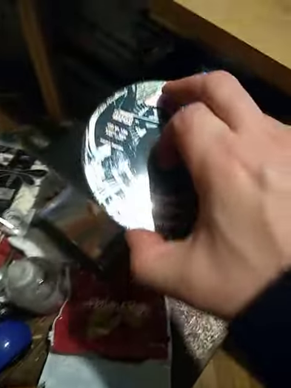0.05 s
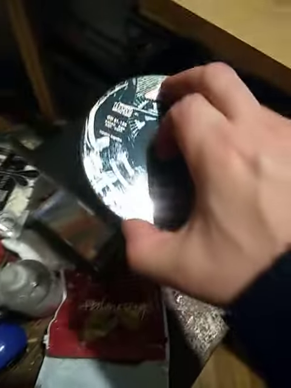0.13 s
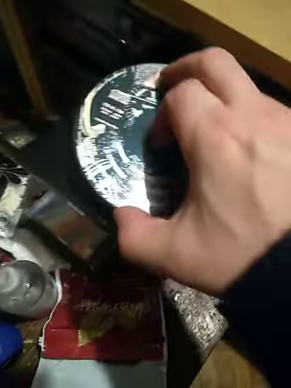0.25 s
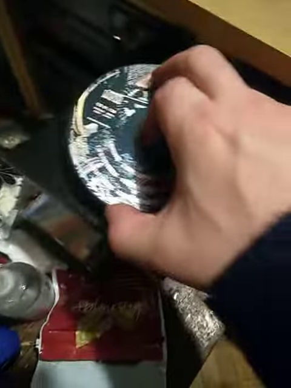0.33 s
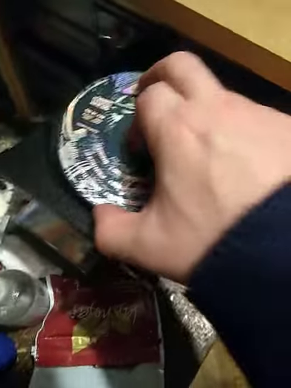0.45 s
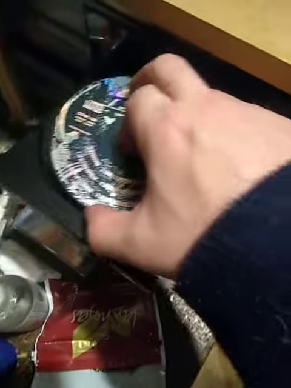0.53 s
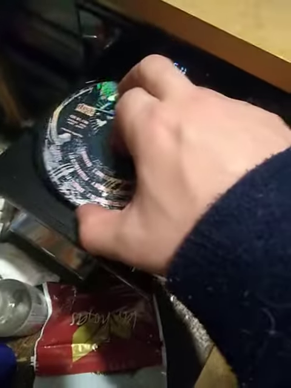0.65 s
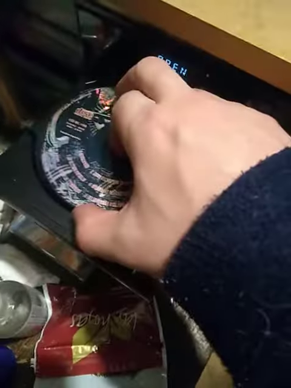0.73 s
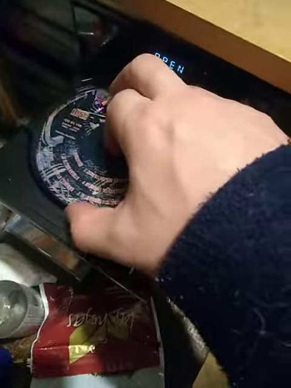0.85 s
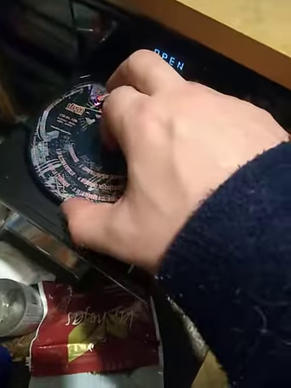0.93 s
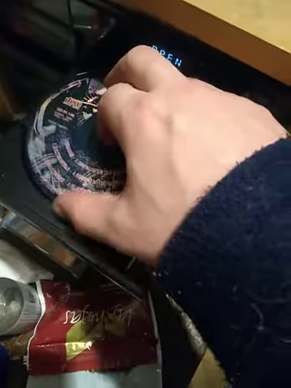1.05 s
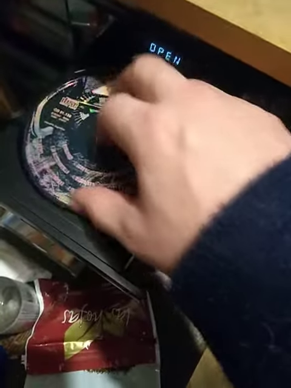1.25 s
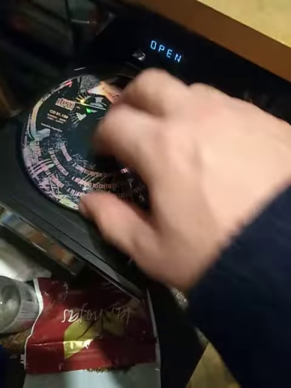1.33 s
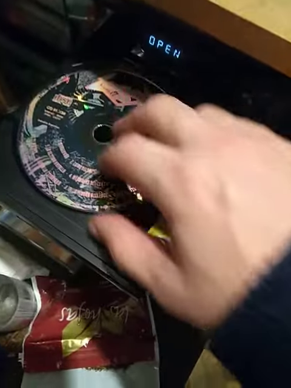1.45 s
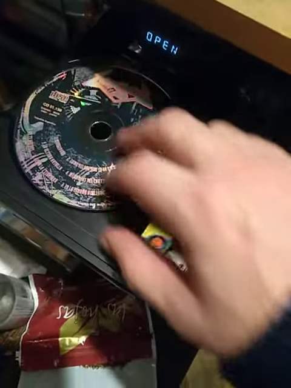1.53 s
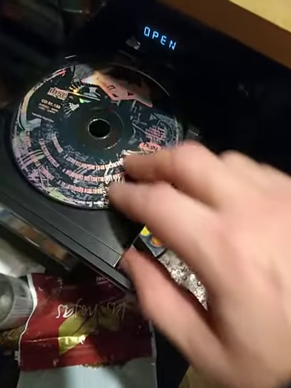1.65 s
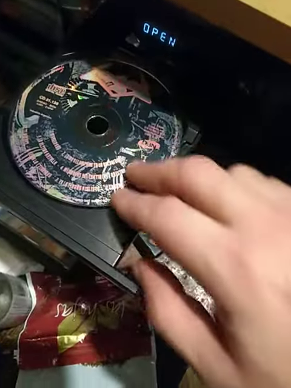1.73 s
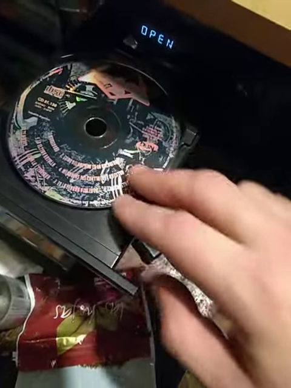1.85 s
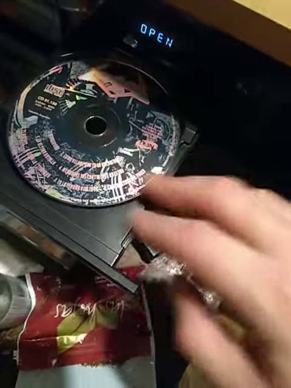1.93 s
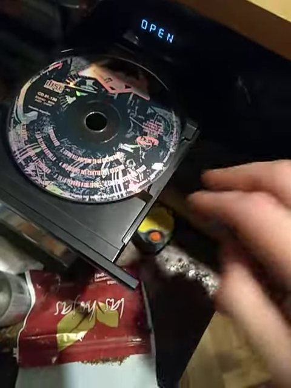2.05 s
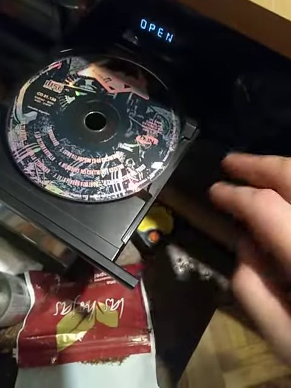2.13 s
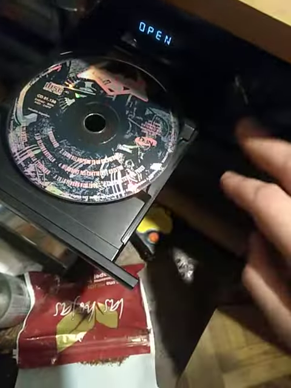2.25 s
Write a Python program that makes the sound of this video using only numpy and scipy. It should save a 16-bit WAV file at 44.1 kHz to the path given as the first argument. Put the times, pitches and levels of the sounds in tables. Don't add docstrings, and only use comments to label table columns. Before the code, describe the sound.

A disc drops with a hard plastic clack into an open player tray, then the tray clicks, whirrs inward on a small motor and grinds shut.

```python
import sys
import numpy as np
from scipy import signal
from scipy.fft import rfft, irfft, next_fast_len
from scipy.io import wavfile
from scipy.ndimage import uniform_filter1d

SR = 44100
rng = np.random.default_rng(int(sys.argv[2]) if len(sys.argv) > 2 else 0)


def elevation(decibels):
    levels = np.asarray(decibels, float)
    return 10 ** (levels / 20)


def generate_wav(signal):
    frames = np.transpose(np.atleast_2d(signal))
    scaled = np.clip(frames, -1, 1) * 32767
    pcm = np.round(scaled).astype(np.int16)
    wavfile.write(sys.argv[1], SR, pcm)


N = 246078


def evened(x):
    return x / np.sqrt(np.mean(x ** 2) + 1e-20)


def read(points, hz):
    f, value = np.transpose(points)
    return np.interp(np.log(hz + 1), np.log(f + 1), value)


def colour(x, points):
    size = next_fast_len(x.shape[-1])
    gain = elevation(read(points, np.fft.rfftfreq(size, 1 / SR)))
    return irfft(rfft(x, size) * gain, size)[..., :x.shape[-1]]


def resonate(x, hz, width_hz):
    r = np.exp(-np.pi * width_hz / SR)
    return signal.lfilter([1 - r, 0, r - 1], [1, -2 * r * np.cos(2 * np.pi * hz / SR), r * r], x)


def resonate_twice(x, hz, width_hz):
    return resonate(resonate(x, hz, width_hz), hz, width_hz)


def wander(size, hz):
    return evened(signal.lfilter([1], [1, -np.exp(-2 * np.pi * hz / SR)], rng.standard_normal(size)))


def add(mix, s, sound):
    part = mix[round(s * SR):][:len(sound)]
    part += sound[:len(part)]


# f/Hz, level/dB
RUMBLE = [(30, -17), (60, -8), (120, 1.5), (165, 5.5), (270, -3.5), (320, -4), (400, -24), (600, -88)]
# f/Hz, width/Hz, level/dB
HUM = [(157.8, 8.2, -8.5), (255, 75, -10), (288.5, 21, -9.5)]
# f/Hz, level/dB
HISS = [(60, -9.5), (450, -4.5), (800, -7), (1400, -10), (3500, -14), (7000, -20), (10000, -25.5),
        (15000, -28)]
# f/Hz, share/1
SAME = [(60, 0.31), (200, 1), (350, 0.55), (550, 0.12), (1500, 0.067), (4000, 0.017)]
# t/s (middle), half length/s, lift/dB
SURGES = [(0.0, 0.025, 3), (0.269, 0.037, 6.5), (0.744, 0.014, 4), (0.823, 0.021, 8.5), (.93, 0.04, -2),
          (1.238, 0.11, 6.5), (1.47, 0.07, 4), (1.633, 0.033, 2.5), (1.756, 0.025, -2), (1.826, 0.023, 5.5),
          (1.928, 0.061, 5), (2.186, 0.14, 4.5), (2.35, 0.022, -4), (2.493, 0.035, 4), (2.74, 0.11, 3.5),
          (3.03, 0.026, -0.5), (3.277, 0.028, 5.5), (3.497, .13, 2), (4.943, .1, 5), (5.287, 0.16, 5.5)]


def floor():
    lag_s = 0.00022
    lift_start_s, lift_end_s, lift_ramp_s, lift_db = 3.75, 5.47, 0.11, 7
    size = next_fast_len(N)
    hz = np.fft.rfftfreq(size, 1 / SR)
    near, other = rfft(rng.standard_normal((2, 2, size)))
    same = np.clip(read(SAME, hz), 0, .99)
    late = same * near * np.exp(-2j * np.pi * hz * lag_s) + np.sqrt(1 - same ** 2) * other
    low, high = irfft(np.stack([near, late], axis=1), size)[..., :N]
    t = np.arange(N) / SR
    swell_db = sum(db * np.exp(-((t - s) / half) ** 2) for s, half, db in SURGES)
    to_edge_s = np.minimum(t - lift_start_s, lift_end_s - t)
    swell_db += lift_db * np.clip(to_edge_s / lift_ramp_s, 0, 1)
    swell_db += 2.8 * uniform_filter1d(wander(N, 26.0), 400)
    hum = sum(elevation(db) * evened(resonate_twice(low, f, 0.69 * w)) for f, w, db in HUM)
    rumble = (evened(colour(low, RUMBLE)) + hum) * elevation(-50.0 + swell_db)
    return rumble + evened(colour(high, HISS)) * elevation(-59.5)


def hit(db, hz, t60, treble_db, bass_db, modes, bright, own_db, blow_s, damping=0.26):
    t = np.arange(SR // 4) / SR
    blow_noise, crack_noise, thud_noise, spot_noise = rng.standard_normal((4, len(t)))
    blow = blow_noise * (t / blow_s) * np.exp(-t / blow_s)
    ring = sum(elevation(d - 60 * t / min(decay, 1.57 * t60)) * np.sin(2 * np.pi * f * t)
               for f, d, decay in modes)
    body = signal.fftconvolve(blow, ring)[:len(t)]
    spot = evened(resonate_twice(spot_noise, hz, damping * hz)) * elevation(own_db - 60 * t / t60)
    crack = evened(colour(crack_noise, bright)) * elevation(treble_db - 60 * t / (0.93 * t60))
    thud = evened(resonate_twice(thud_noise, 272, 330)) * elevation(bass_db - 60 * t / (1.83 * t60))
    rise = 1 - np.exp(-t / blow_s)
    thud_rise = 1 - np.exp(-t / 0.011)
    return elevation(db) * (body / abs(body).max() + rise * (spot + crack) + thud * thud_rise)


# t/s, peak/dB, ring f/Hz, treble/dB
TOUCHES = [
    (.795, -55, 890, 5),
    (.962, -45.5, 900, 4),
    (0.966, -47.5, 1600, -1),
    (1.413, -50.5, 1046, 7),
    (1.751, -44.5, 2140, -2),
    (1.777, -43, 1075, -2),
    (1.808, -39, 900, 6),
    (1.849, -51, 970, -5),
    (2.93, -52.5, 1400, 6.5),
    (3.504, -52, 682, -20),
]
# f/Hz, level/dB, t60/s
DISC_MODES = [(291, -5, .2), (532, -21, 0.044), (780, -9, 0.18), (900, -2.5, 0.06), (1010, 0, 0.06),
              (1400, -16, 0.2), (1803, -13, 0.16), (2146, -75, 0.022), (3610, -0.5, 0.027),
              (5900, 1.5, 0.0084), (7000, -7, 0.022)]
# f/Hz, level/dB
SCUFF = [(500, -18), (1000, -3), (2000, -1.5), (3600, -4.5), (5000, -9.5), (8000, -30), (15000, -49)]


def touches(mix):
    for s, db, hz, treble_db in TOUCHES:
        add(mix, s, hit(db - 7.0, hz, 0.13, treble_db, -18, DISC_MODES, SCUFF,
                        own_db=3.0, blow_s=0.0073, damping=0.046))


# t/s, peak/dB, ring f/Hz
THUMPS = [
    (1.166, -36.5, 297),
    (1.181, -36, 900),
    (5.172, -29.5, 370),
    (5.222, -21, 347),
    (5.263, -30, 524),
    (5.353, -27, 340),
    (5.40, -41, 330),
    (5.429, -33, 286),
]
# f/Hz, level/dB, t60/s
CASE_MODES = [(330, -6.5, 0.05), (890, -3.5, 0.2), (1111, -4.5, 0.12), (1410, 0.5, 0.035), (1905, 3, 0.012),
              (2560, -0.5, 0.025), (3545, -12.5, 0.026), (4580, -20, 0.05), (6170, -24.5, 0.047)]


def thumps(mix):
    for s, db, hz in THUMPS:
        add(mix, s, hit(db, hz, 0.069, -15, -2.5, CASE_MODES[:1], SCUFF,
                        own_db=1.0, blow_s=0.0028, damping=0.17))


# t/s, peak/dB, ring f/Hz, t60/s
DISC = [
    (1.187, -9, 887, 0.069),
    (1.294, -36.5, 980, 0.084),
    (1.366, -34.5, 1110, 0.12),
]
# f/Hz, level/dB
CRACK = [(500, -15), (1500, -9.5), (3500, -8), (6000, -6), (8000, -15), (11000, -30), (15000, -33.5)]
# f/Hz, level/dB
CLACK = [(500, -26.5), (1200, -2), (2000, 1.5), (4000, 0), (6000, -4.5), (8000, -14), (15000, -30)]


def disc(mix):
    for s, db, hz, t60 in DISC:
        bright = CRACK if s < 1.25 else CLACK
        add(mix, s, hit(db - 5.5, hz, t60, -2, -4.5, DISC_MODES, bright, own_db=-9.0, blow_s=0.00074))


# t/s, peak/dB, ring f/Hz, treble/dB, bass/dB
KNOCKS = [(3.713, -25, 1410, 4.5, -36), (3.724, -34, 1300, -12, -14), (3.758, -11.5, 985, -3.5, -15),
          (3.803, -18.5, 950, -3, -3), (3.857, -19.5, 1400, -3, -7), (3.865, -18, 1260, -8, -5),
          (3.884, -7, 1410, -23, -12), (3.899, -25, 1170, -11, -20), (4.59, -22.5, 1410, -24, -21),
          (5.165, -18.5, 905, -24, -20), (5.199, -23, 755, -20, -29), (5.29, -23.5, 840, -12.5, -4)]


def knocks(mix):
    for s, db, hz, treble_db, bass_db in KNOCKS:
        add(mix, s, hit(db - 7.0, hz, 0.042, treble_db, bass_db, CASE_MODES, CLACK,
                        own_db=-3.0, blow_s=0.00093))


# t/s, peak/dB, treble/dB, bass/dB
SNAPS = [
    (3.7877, -38, 18, 9.5),
    (5.1562, -19, -32, -20),
    (5.3494, -25, 2, -17),
]


def snaps(mix):
    for s, db, treble_db, bass_db in SNAPS:
        add(mix, s, hit(db - 2.0, 3400, .034, treble_db, bass_db, CASE_MODES, CLACK,
                        own_db=2.5, blow_s=0.0024))


# t/s, level/dB
MOTOR = [
    (3.905, -30.5),
    (3.92, -38),
    (4.2, -36.5),
    (4.392, -35.5),
    (4.61, -40),
    (4.92, -36),
    (5.03, -36),
    (5.143, -40),
]
# t/s, f/Hz
SPEED = [(3.89, 281), (4.0, 287), (4.33, 291), (4.44, 288.5), (4.55, 277.5), (4.86, 273), (4.95, 284),
         (5.03, 291), (5.16, 292)]
# f/Hz, width/Hz, level/dB
CHASSIS = [(553, 19, -11), (870, 25, 1.3), (1074, 64, -24), (1390, 145, 4.5), (1556, 90, -19),
           (2170, 160, -19)]
# f/Hz, level/dB
GEARS = [(200, -24.5), (560, -19), (720, -6), (830, -2.5), (1400, 2), (2200, -4), (3000, -8), (3600, -6),
         (4600, 0.5), (5500, -24.5), (6000, -56), (6450, -16.5), (7200, -46), (12000, -88.5)]


def motor():
    teeth_per_turn = 0.21
    rattle_start_db, rattle_db_per_s = -53.5, 5.5
    rack_end_s, squeal_start_db, squeal_db_per_s = 4.9, -56, 44
    s, effort_db = np.transpose(MOTOR)
    t = np.arange(s[0] - .015, s[-1] + 0.023, 1 / SR)
    size = len(t)
    rattle_db = rattle_start_db + rattle_db_per_s * (t - t[0])
    squeal_db = squeal_start_db + squeal_db_per_s * np.maximum(t - rack_end_s, 0)
    hz = np.interp(t, *np.transpose(SPEED))
    turns = np.cumsum(hz * (1 + .008 * wander(size, 40))) / SR
    throb = np.cos(2 * np.pi * (teeth_per_turn * turns + 0.11 * wander(size, 6.9)))
    pulses = sum(np.cos(2 * np.pi * k * turns) for k in range(1, 16)) * elevation(3 * wander(size, 30))
    whine = evened(sum(elevation(db) * resonate_twice(pulses, f, 1.5 * w) for f, w, db in CHASSIS))
    chop = 0.67 + np.exp(-(turns % 1) / 1.5)
    chopped = rng.standard_normal(size) * chop * elevation(1.8 * wander(size, 54))
    gears = evened(colour(chopped, GEARS))
    high = signal.sosfilt(signal.butter(4, 2600, "high", fs=SR, output="sos"), gears)
    buzz = evened(sum(elevation(db) * resonate(chopped, f, 0.5 * w) for f, w, db in CHASSIS))
    low = elevation(-3.5) * whine + elevation(-14) * buzz + elevation(-4) * evened(gears - high)
    squeal = elevation(squeal_db) * evened(resonate_twice(chopped, 3500, 600))
    rattle = elevation(rattle_db) * evened(high) + squeal
    sound = (elevation(np.interp(t, s, effort_db)) * low + rattle) * elevation(3.4 * throb)
    return t[0], sound * signal.windows.tukey(size, .025)


# t/s, pressure/dB
CLAMP = [
    (5.15, -36),
    (5.164, -40),
    (5.186, -48),
    (5.23, -34.5),
    (5.25, -40.5),
    (5.38, -38.5),
    (5.446, -57.5),
    (5.49, -80),
]
# f/Hz, level/dB
GRIND = [
    [(60, -7), (150, -9), (330, 12), (520, -10), (750, -1), (1100, -67)],
    [(500, -10), (800, 13.5), (1000, 6), (1400, 8), (2000, -10), (2600, -37)],
    [(1800, 3.5), (2500, 7.5), (3400, 14), (4300, 7.5), (5200, -1.5), (6500, -15.5), (9000, -70)],
]


def clamp():
    tray_db, gears_db, case_peak_db = -4, 2, -34.5
    seat_s, seat_rise_db_per_s, seat_fall_db_per_s = 5.23, 500, 112
    s, pressure_db = np.transpose(CLAMP)
    t = np.arange(s[0], s[-1], 1 / SR)
    size = len(t)
    slip_now = rng.random(size) < 700 / SR
    slip_amp = elevation(2.6 * np.minimum(rng.exponential(1, size), 2.5))
    slips = slip_now * slip_amp * rng.choice([-1, 1], size)
    drive = evened(slips) + 0.83 * rng.standard_normal(size)
    drive = drive * elevation(5.5 * np.cos(2 * np.pi * (54 * t + 0.25 * wander(size, 16))))
    pressure_db = np.interp(t, s, pressure_db)
    case_db = case_peak_db - np.maximum(seat_rise_db_per_s * (seat_s - t),
                                        seat_fall_db_per_s * (t - seat_s))
    levels_db = case_db, pressure_db + tray_db, pressure_db + gears_db
    grind = sum(evened(colour(drive, part)) * elevation(db) for part, db in zip(GRIND, levels_db))
    return s[0], grind * signal.windows.tukey(size, .08)


# f/Hz, t60/s
ROOM = [(100, 0.32), (500, 0.3), (2000, 0.19), (8000, 0.12), (15000, 0.31)]


def room(x):
    taps = np.zeros((2, SR // 2))
    jitter = rng.integers(0, 20, (2, (SR // 2 - 121) // 20))
    at = np.arange(120, SR // 2 - 20, 20) + jitter
    np.put_along_axis(taps, at, rng.choice([-1., 1.], at.shape), 1)
    hz, t, z = signal.stft(taps, SR, nperseg=256)
    tail = signal.istft(z * elevation(-60 * t / read(ROOM, hz)[:, None]), SR, nperseg=256)[1]
    return signal.fftconvolve(x[None], tail / np.linalg.norm(tail[0]), axes=1)[:, :N]


# f/Hz, level/dB
SHADOW = [(300, -1), (3500, -1), (6000, -5), (8500, -2), (14000, 0)]
# f/Hz, phase/rad
LAG = [(60, .1), (500, 0.9), (1000, 1.32), (2000, 1.02), (3000, 4.22), (4500, 5.58), (6000, 3.3),
       (9000, 24.2), (14000, 3.9)]


def far_capsule(player):
    size = next_fast_len(N)
    hz = np.fft.rfftfreq(size, 1 / SR)
    path = elevation(read(SHADOW, hz)) * np.exp(-1j * read(LAG, hz))
    return irfft(rfft(player, size) * path, size)[:N]


def scene():
    player = np.zeros(N)
    disc(player)
    touches(player)
    thumps(player)
    snaps(player)
    knocks(player)
    add(player, *motor())
    add(player, *clamp())
    return np.array([far_capsule(player), player]) + elevation(-5.0) * room(player) + floor()


def band_limit(x):
    return signal.sosfilt(signal.butter(12, 15300, fs=SR, output="sos"), x)


# f/Hz, share/1
CROSS = [(60, 0.7), (1100, 1), (2250, 0.85), (3400, 0.69), (4500, 0.61), (5700, 0.54), (8000, 0.045),
         (15000, 0.22)]
# t/s, half length/s, level/dB
SHUT = [
    (0.94, 0.0054, -20),
    (2.044, 0.0079, -9.5),
]


def record(dry):
    cross_s = 0.0004437
    size = next_fast_len(N)
    hz, z = np.fft.rfftfreq(size, 1 / SR), rfft(dry, size)
    cross = np.clip(read(CROSS, hz), 0, .99) * np.exp(-2j * np.pi * hz * cross_s)
    bass_cut = hz ** 2 / (hz ** 2 + 35. ** 2)
    wide = elevation(-1.5) * irfft(bass_cut * (z - cross * z[::-1]), size)[:, :N]
    power_db = 10 * np.log10(abs(uniform_filter1d((wide ** 2).mean(0), 300)) + 1e-12)
    fall_db = np.arange(N) * 350.0 / SR
    held_db = np.maximum.accumulate(power_db + fall_db) - fall_db
    gate_db = np.clip(0.71 * (held_db + 38.5), -18, 0)
    gate_db -= np.clip(0.23 * (held_db + 43), 0, 4)
    gate_db += sum(db * (abs(np.arange(N) / SR - s) < half) for s, half, db in SHUT)
    return band_limit(wide * elevation(uniform_filter1d(gate_db, 150)))


dry = scene()
out = record(dry)
generate_wav(out)
```